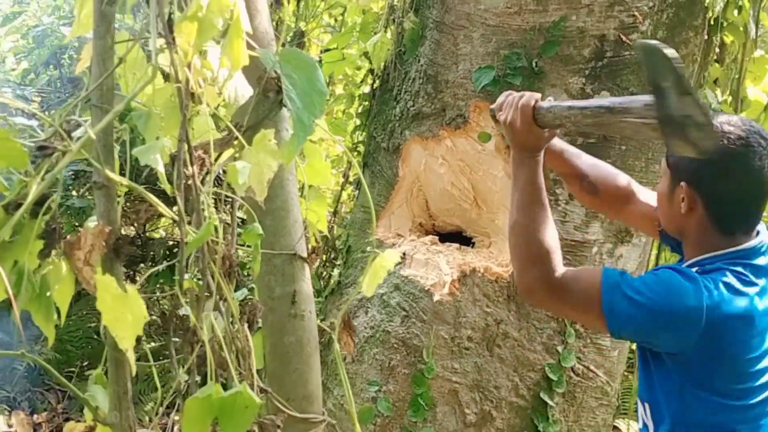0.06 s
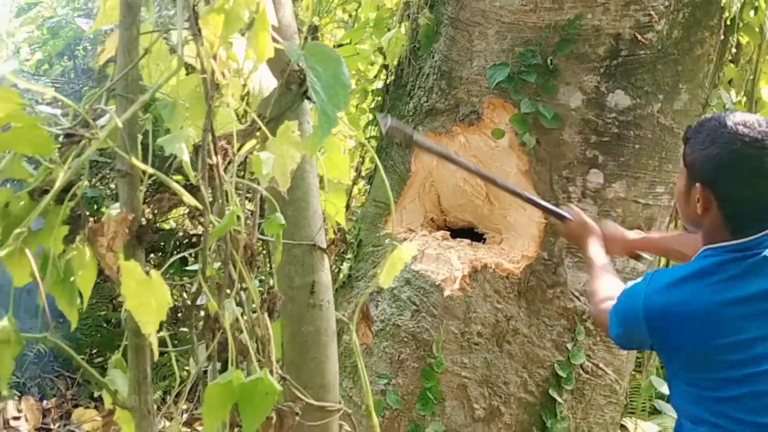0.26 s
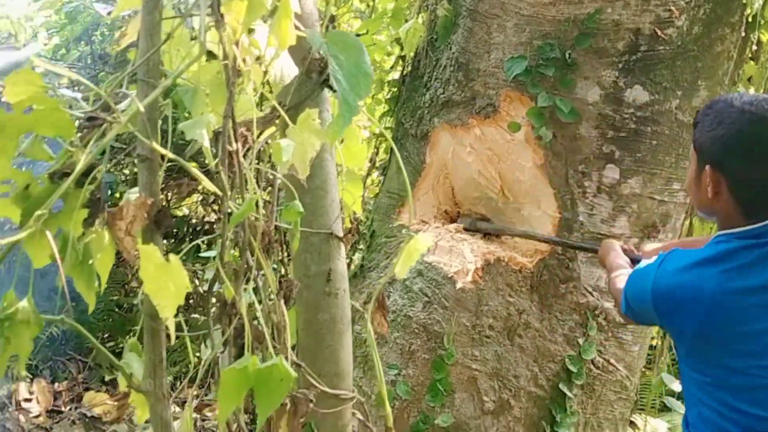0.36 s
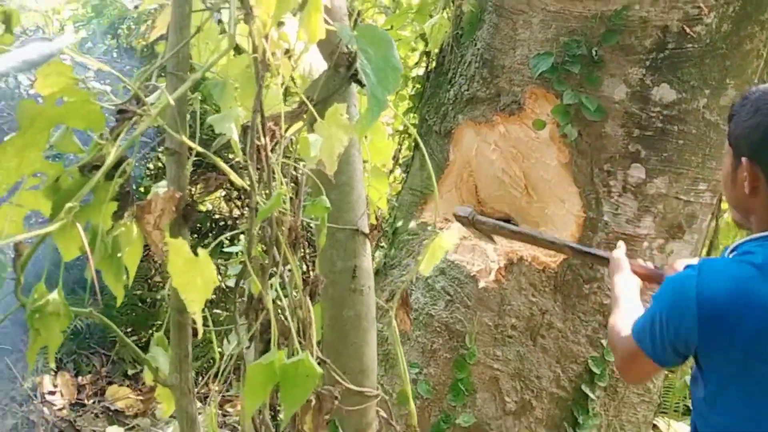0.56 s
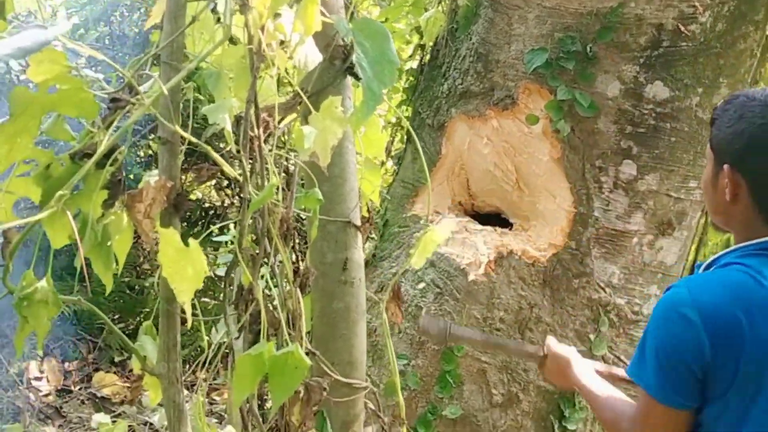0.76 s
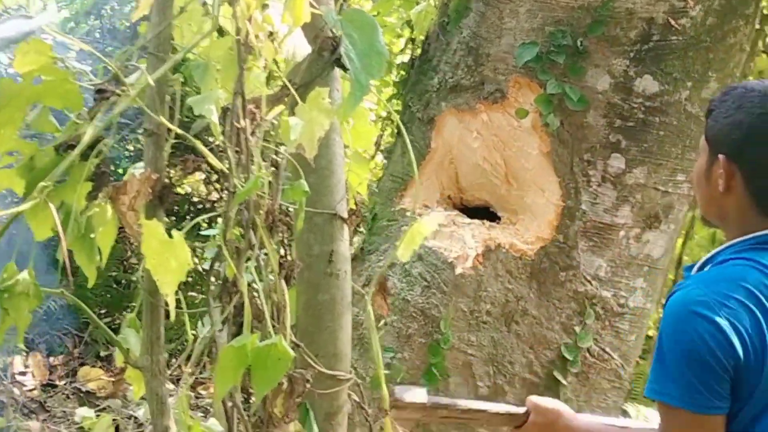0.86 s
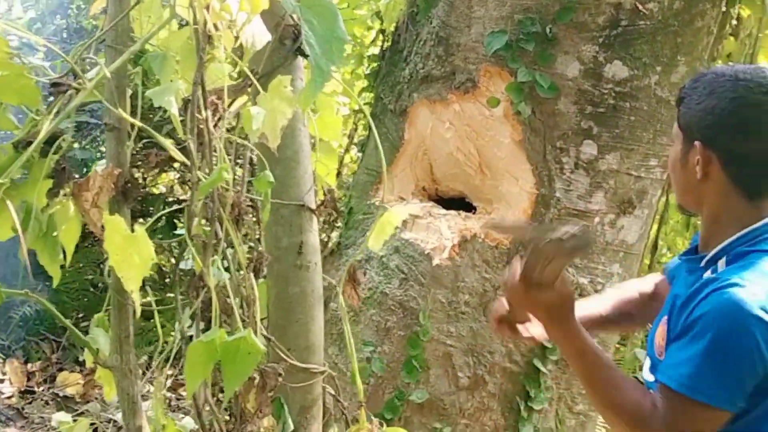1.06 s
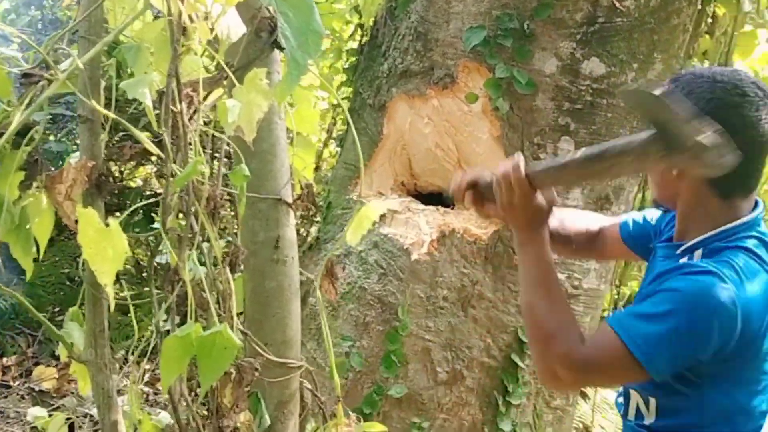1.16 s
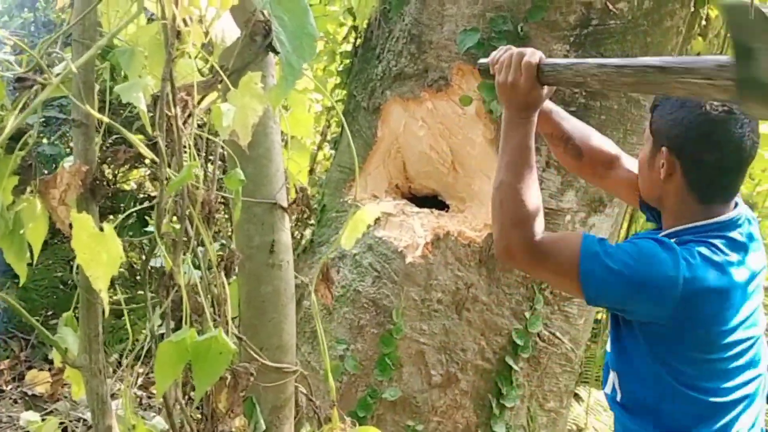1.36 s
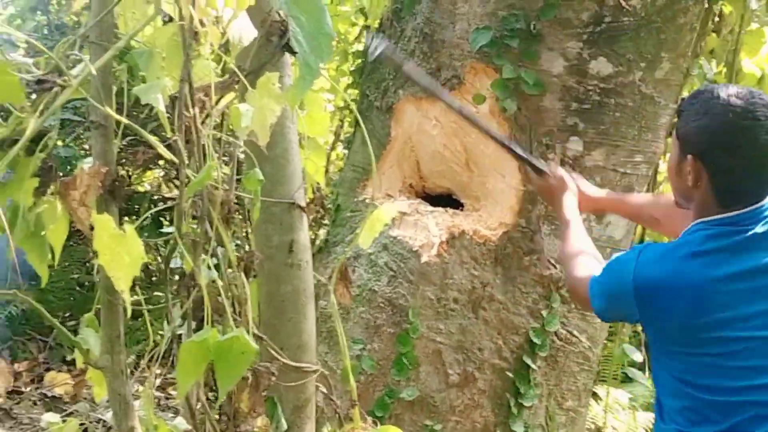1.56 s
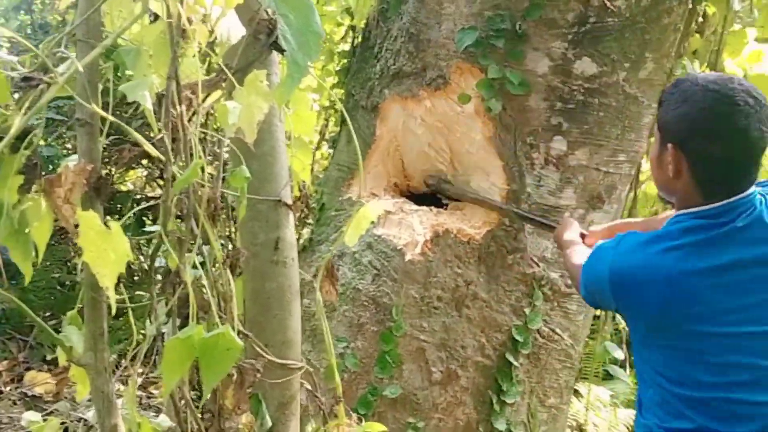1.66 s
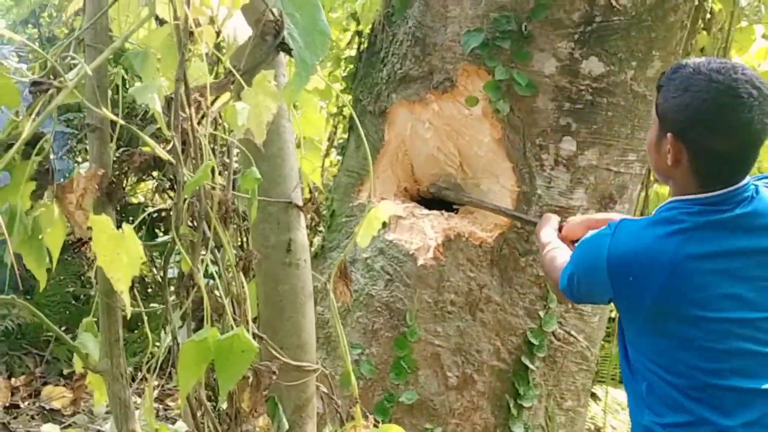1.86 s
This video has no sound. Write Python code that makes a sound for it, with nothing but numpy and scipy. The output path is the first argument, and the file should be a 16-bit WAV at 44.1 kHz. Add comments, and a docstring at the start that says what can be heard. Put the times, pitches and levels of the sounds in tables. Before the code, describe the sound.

A long blade chops into a living tree at about 0.2 and 1.55 seconds: abrupt, hard woody cracks with crushed wet fibre, a very short trunk ring and faint woodland echo. A soft low knock follows each by a tenth of a second. Between them, leaves rustle lightly from 0.5 to 1.1; small birds whistle and rasp, clearest around 1.05 to 1.5, over faint insect whine and quiet hush.

```python
"""A long blade chops twice into a living tree in a wood, a few metres from the microphone.
Each blow is a bite pulse, bursts of coloured noise for wet fibres, a jolt pulse and decaying trunk tones.
Banded noise and one late echo are the wood answering; a soft knock follows each blow.
Around them leaves rustle in swells of noise, birds whistle in gliding sines, an insect sings in narrow
noise, and hush, a faint drone and a brief low hum lie behind."""
import sys
import numpy as np
from scipy import signal
from scipy.fft import rfft, irfft
from scipy.io import wavfile

SR = 44100
rng = np.random.default_rng(int(sys.argv[2]) if len(sys.argv) > 2 else 0)


def to_wav(sig):
    """Store sig (one row per channel, or 1-D mono) as 16-bit WAV at the path in sys.argv[1].

    Samples outside -1..1 are clipped; the rate is SR.
    """
    pcm = np.clip(np.atleast_2d(sig), -1, 1) * 32767
    pcm = np.round(pcm).astype(np.int16)
    wavfile.write(sys.argv[1], SR, pcm.T)  # frames by channels


N = 83790
T = np.arange(N) / SR  # seconds

# The two blows at the notch. Each row: start in seconds, bite level in dB, bite pitch in Hz, time until the
# blade jams in seconds, jolt level in dB, jolt pitch in Hz, then fibre crunch, splinter and jam crack in dB.
CHOPS = [(0.2322, -12, 1090, .0052, -10.5, 1030, -18, -26.5, -16),
         (1.5475, -7.5, 1550, 0.00452, -12, 726, -19.5, -30.5, -35.5)]
# Ringing of trunk and blade; the place of the cut sets the levels.
# Each row: pitch in Hz, 60 dB decay time in seconds, level in dB in the first chop, in the second chop.
TRUNK_MODES = [(106.8, 0.18, -36, -39), (147.4, 0.42, -44.5, -47.5), (223.7, .085, -21, -20.5),
               (309, 0.16, -42, -34), (530, .055, -22.5, -21.5), (712, 0.062, -15.5, -28.5),
               (775, 0.074, -26, -63), (925, 0.039, -21, -18.5), (1076, 0.054, -21, -32.5),
               (1144, 0.04, -21.5, -17.5), (1325, 0.11, -66, -35.5), (1490, 0.036, -44.5, -21.5),
               (1764, .05, -20, -41.5), (2034, 0.032, -56, -19.5), (2460, 0.012, -11.5, -9),
               (2793, 0.046, -28.5, -25.5), (3230, 0.024, -29, -58), (3850, 0.026, -29, -32.5)]
# Colour of crushed wet fibres. Each row: frequency in Hz, relative level in dB.
CRUNCH_COLOUR = [(60, -44), (150, -19), (400, -20), (700, 4.5), (1300, 3.5), (1900, 0.5), (2700, -1),
                 (3500, -5.5), (4500, -23), (9000, -25.5)]
# Colour of splitting wood. Each row: frequency in Hz, relative level in dB.
SPLINTER_COLOUR = [(1500, 14), (3500, -16.5), (4600, 3.5), (5900, -2), (7500, 5), (10500, -7.5),
                   (13500, -5.5), (15000, 1), (16000, 2)]
BITE_CYCLES, JOLT_CYCLES = 0.5, 0.35  # pulse widths in cycles
CRUNCH_T60_S, SPLINTER_T60_S, SPLINTER_HOLD_S = 0.034, 0.05, 0.0041
JAM_CRACK_S = 0.00017


def chops():
    """The edge bites, fibres crush and split, the blade jams and the trunk rings."""
    out = np.zeros(N)
    for k, row in enumerate(CHOPS):
        start, bite_db, bite_hz, jam_s, jolt_db, jolt_hz, crunch_db, splinter_db, crack_db = row
        age = T - start
        out += undb(bite_db) * thud(age, bite_hz, BITE_CYCLES)
        out -= undb(jolt_db) * thud(age - jam_s, jolt_hz, JOLT_CYCLES)
        for hz, t60, *mode_db in TRUNK_MODES:
            ring = np.sin(2 * np.pi * hz * age)
            out += undb(mode_db[k]) * fade(age, t60, rise=1 / hz) * ring  # builds up over about a cycle
        crushing = undb(crunch_db) * fade(age, CRUNCH_T60_S, rise=0.00074)
        out += crushing * noise(CRUNCH_COLOUR, grain_db=3.5)
        splitting = undb(splinter_db) * fade(age, SPLINTER_T60_S, rise=0.00027, hold=SPLINTER_HOLD_S)
        crack = undb(crack_db) * np.exp(-((age - jam_s) / JAM_CRACK_S) ** 2)
        out += (splitting + crack) * noise(SPLINTER_COLOUR, grain_db=0.5)
    return out


# Soft second knocks at the tree after each blow.
# Each row: start in seconds, low thump level in dB, woody rattle level in dB.
KNOCKS = [(0.333, -45, -51.5), (1.637, -40.5, -49.5)]
KNOCK_HZ, KNOCK_T60_S = 120.4, 0.13


def knocks():
    """A soft thump and rattle as the blade settles in the cut."""
    out = np.zeros(N)
    for start, thump_db, rattle_db in KNOCKS:
        age = T - start
        thump = fade(age, KNOCK_T60_S, rise=0.0051) * np.sin(2 * np.pi * KNOCK_HZ * age)
        wood = noise(CRUNCH_COLOUR) + undb(-3) * noise(SPLINTER_COLOUR)
        rattle = fade(age, KNOCK_T60_S, rise=0.007) * wood
        out += undb(thump_db) * thump + undb(rattle_db) * rattle
    return out


# Scatter from ground, undergrowth and far trees. Each row: low edge in Hz, high edge in Hz, near level in dB,
# near 60 dB decay time in seconds, far level in dB, far 60 dB decay time in seconds.
SCATTER = [(70.6, 158, -47.5, 0.61, -88.5, 0.39), (162, 273.5, -36.5, .31, -69, 0.57),
           (278, 600, -34.5, 0.12, -57.5, 0.74), (553, 1244, -29, .13, -50.5, 1),
           (1420, 2860, -33.5, 0.16, -52.5, 0.71), (3040, 5650, -49, 0.2, -68, 0.85),
           (5560, 13800, -46, 0.2, -74, 0.43)]
SCATTER_RISE_S, SCATTER_RISE_CYCLES = 0.0044, 0.83
PATCH_DB, PATCH_RATE = 1, 140  # spread in dB, random points per second
ECHO_S, ECHO_DB, ECHO_T60_S, ECHO_HZ = 0.15, -37.5, 0.14, 1000  # a stand of trunks answers late


def woodland(blows):
    """Each blow comes back in patches from near undergrowth and far trees, with one dull late echo."""
    dulled = signal.sosfilt(signal.butter(2, ECHO_HZ, fs=SR, output="sos"), blows)
    out = undb(ECHO_DB) * smear(dulled, ECHO_T60_S, ECHO_S)
    for start, *_ in CHOPS:
        age = T - start
        for lo_hz, hi_hz, near_db, near_t60, far_db, far_t60 in SCATTER:
            rise = SCATTER_RISE_S + SCATTER_RISE_CYCLES / hi_hz
            near = undb(near_db) * fade(age, near_t60, rise)
            far = undb(far_db) * fade(age, far_t60, rise=0.08)
            patchy = unit(band(lo_hz, hi_hz) * undb(PATCH_DB * wander(PATCH_RATE)))
            out += patchy * np.hypot(near, far)
    return out


# Rustles in the litter. Each row: peak time in seconds, swell time in seconds (one standard deviation),
# hiss level in dB, dull crunch level in dB.
RUSTLES = [(0.125, 0.12, -66.5, -83), (0.457, .012, -65, -89), (0.524, 0.034, -65, -73),
           (0.635, 0.024, -59, -89.5), (.75, 0.027, -58.5, -63.5), (.797, 0.0038, -61.5, -62.5),
           (0.829, 0.004, -68, -67), (0.861, 0.0081, -65.5, -84.5), (.962, 0.00476, -69.5, -64),
           (1.005, 0.0029, -62, -55.5), (1.034, 0.077, -62, -94.5), (1.125, 0.004, -60.5, -58),
           (1.473, 0.0027, -66, -73.5)]
# Colour of the leaf hiss. Each row: frequency in Hz, relative level in dB.
LEAF_COLOUR = [(800, -36), (2500, 6.5), (4000, 7.5), (5500, 0), (8000, 4.5), (11000, -0.5), (15500, 6)]
# Colour of the dull leaf crunch. Each row: frequency in Hz, relative level in dB.
DULL_LEAF_COLOUR = [(200, -16), (600, 2.5), (1000, 5.5), (2500, 6.5), (5000, -22), (12000, -22.5)]
RUSTLE_TAIL = 1.35  # swell times until a rustle has fallen to half


def leaves():
    """Leaf litter rustles as the blade is pulled free and the feet shift."""
    hiss = noise(LEAF_COLOUR, grain_db=1.5)
    crunch = noise(DULL_LEAF_COLOUR, grain_db=5)
    out = np.zeros(N)
    for peak, swell_s, hiss_db, dull_db in RUSTLES:
        age = (T - peak) / swell_s
        rising = np.exp(-0.5 * age ** 2)
        falling = 1 / (1 + (age / RUSTLE_TAIL) ** 2)
        swell = np.where(T < peak, rising, falling)
        out += swell * (undb(hiss_db) * hiss + undb(dull_db) * crunch)
    return out


# Bird notes among the trees. Each row: start in seconds, length in seconds, start pitch in Hz,
# end pitch in Hz, level in dB before the soft edges, roughness from 0 to 1.
BIRD_NOTES = [(0.178, 0.052, 1940, 3400, -68.5, .2), (0.576, .09, 2245, 4040, -70, 0.3),
              (0.865, 0.037, 4305, 2150, -67, .2), (0.948, 0.081, 1926, 3950, -66.5, 0.35),
              (1.058, 0.096, 2408, 2300, -54, 0.85), (1.12, 0.16, 2610, 2390, -65.5, 1),
              (1.236, 0.027, 5020, 2620, -64.5, .2), (1.27, 0.032, 1816, 1780, -62, 0.3),
              (1.273, 0.096, 3083, 2960, -62.5, 0.77), (1.323, 0.054, 2223, 2056, -52.5, 0.25),
              (1.354, 0.049, 3040, 3900, -65.5, 0.3), (1.361, 0.066, 2174, 2140, -52.5, 0.3),
              (1.436, 0.089, 2593, 2506, -58, 0.9), (1.462, 0.092, 2472, 1995, -57, 0.38)]
NOTE_EDGE_S, RASP_RATE = 0.02, 400  # rasp in random points per second
BIRD_ECHO_DB, BIRD_T60_S = -4, 0.35


def birds():
    """Gliding whistles, some raspy from random amplitude and phase, smeared by the trees."""
    song = np.zeros(N)
    for start, length, from_hz, to_hz, db, rough in BIRD_NOTES:
        pitch = np.interp(T, [start, start + length], [from_hz, to_hz])
        phase = 2 * np.pi * np.cumsum(pitch) / SR
        rasp = wander(RASP_RATE) * np.sin(phase) + wander(RASP_RATE) * np.cos(phase)
        clear = np.sqrt(2 * (1 - rough ** 2)) * np.sin(phase)
        song += undb(db) * gate(start, length, NOTE_EDGE_S) * (clear + rough * rasp)
    return song + undb(BIRD_ECHO_DB) * smear(song, BIRD_T60_S)


# Insect phrases. Each row: start in seconds, length in seconds, pitch in Hz, level in dB.
INSECT_PHRASES = [(-.05, .31, 6400, -76), (.32, .32, 6400, -74), (.57, .22, 6400, -76),
                  (.7, 1.25, 7080, -82.5)]
INSECT_WIDTH_HZ, INSECT_EDGE_S = 150, 0.05


def insect():
    """A thin, grainy high note in long phrases."""
    out = np.zeros(N)
    for start, length, hz, db in INSECT_PHRASES:
        out += undb(db) * gate(start, length, INSECT_EDGE_S) * whine(hz, INSECT_WIDTH_HZ)
    return out


# Colour of the outdoor hush at the microphone. Each row: frequency in Hz, relative level in dB.
AIR_COLOUR = [(20, 1), (42, 1), (62, -2), (110, -10.5), (175, -15.5), (300, -15.5), (565, -13), (985, -16),
              (1380, -16), (1920, -18.5), (2680, -16), (3300, -26.5), (5300, -31), (6300, -34.5),
              (7800, -25.5), (9400, -33.5), (12500, -30.5), (15500, -20)]
AIR_DB = -62.5
HUM_HZ, HUM_DB, HUM_END_S, HUM_FADE_S = 124.6, -66.5, 0.14, 0.077
DRONE_HZ, DRONE_WIDTH_HZ, DRONE_DB = 382, 10, -76


def air():
    """Quiet outdoor hush and rumble, a faint far drone, and a low hum that dies away."""
    hush = undb(AIR_DB + 0.2 * wander(6.01)) * noise(AIR_COLOUR)
    hum = undb(HUM_DB) * np.sqrt(2) * np.sin(2 * np.pi * HUM_HZ * T)
    hum *= np.clip((HUM_END_S - T) / HUM_FADE_S, 0, 1)
    drone = undb(DRONE_DB) * whine(DRONE_HZ, DRONE_WIDTH_HZ)
    return hush + hum + drone


def undb(db):
    """Decibels to gain."""
    return 10 ** (np.asarray(db) / 20)


def unit(x):
    """Scale to standard deviation 1."""
    return x / np.std(x)


def shape(source, gain):
    """Filter by a gain for each frequency, at unit level."""
    return unit(irfft(rfft(source) * gain, N))


def noise(colour, grain_db=0):
    """Noise of a given colour; random level steps every 20 samples make it crackle."""
    hz, db = np.array(colour, float).T
    grain = np.repeat(rng.standard_normal(N // 20 + 1), 20)[:N]
    source = rng.standard_normal(N) * undb(grain_db * grain)
    freq = np.arange(N // 2 + 1) * SR / N
    return shape(source, undb(np.interp(np.log(freq + 1), np.log(hz), db)))


def whine(hz, width_hz):
    """An unsteady tone: noise in one narrow resonance, its width taken at half amplitude."""
    freq = np.arange(N // 2 + 1) * SR / N
    return shape(rng.standard_normal(N), 1 / (1 + (2 * (freq - hz) / width_hz) ** 2))


def band(lo_hz, hi_hz):
    """Noise between two edges."""
    sos = signal.butter(4, [lo_hz, hi_hz], btype="band", fs=SR, output="sos")
    return unit(signal.sosfilt(sos, rng.standard_normal(N)))


def wander(rate):
    """Random motion with spread 1, drawn in straight lines between rate points per second."""
    return unit(np.interp(T * rate, np.arange(N), rng.standard_normal(N)))


def fade(age, t60, rise, hold=0):
    """Exponential rise, hold, then exponential decay by 60 dB in t60 seconds."""
    age = np.maximum(age, 0)
    decay = np.exp(-np.log(1000) * np.maximum(age - hold, 0) / t60)
    return (1 - np.exp(-age / rise)) * decay


def gate(start, length, edge):
    """A soft-edged on and off."""
    from_edge = np.minimum(T - start, start + length - T)
    return np.sin(np.pi / 2 * np.clip(from_edge / edge, 0, 1)) ** 2


def thud(age, hz, cycles):
    """A single short pressure swing, down then up, centred on age 0."""
    return np.sin(2 * np.pi * age * hz) * np.exp(-(age * hz / cycles) ** 2)


def smear(x, t60, delay=0):
    """A sound spread out by many small reflections."""
    trees = rng.standard_normal(N) * fade(T - delay, t60, rise=0.006)
    return signal.fftconvolve(x, trees / np.linalg.norm(trees))[:N]


def scene():
    """Everything at one microphone."""
    blows = chops()
    return (blows + knocks() + woodland(blows) + leaves() + birds() + insect() + air())[None]


def record(dry):
    """The recorder cuts the top, steeply above 15.7 kHz."""
    top_cut = signal.ellip(10, 0.2, 70, 15700, fs=SR, output="sos")  # ripple and stop depth in dB
    return signal.sosfilt(top_cut, dry)


dry = scene()
out = record(dry)
to_wav(out)
```